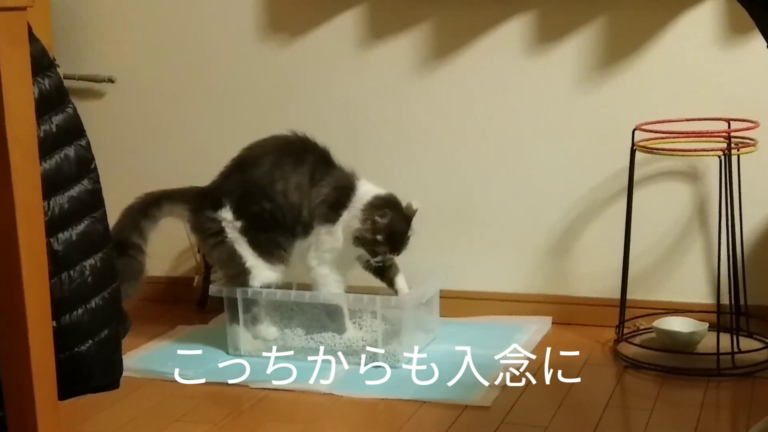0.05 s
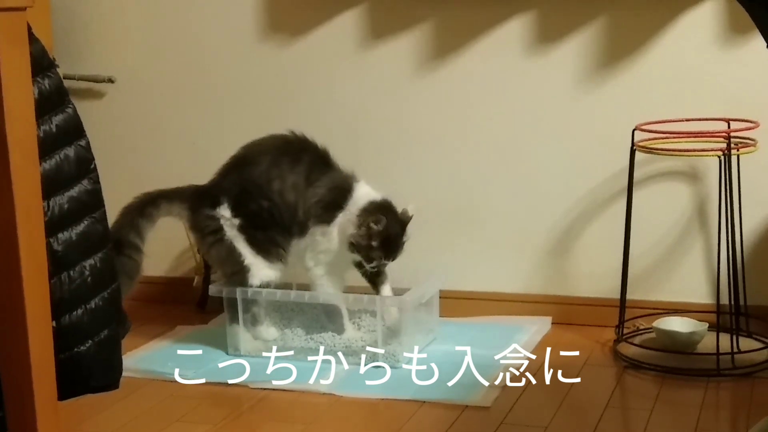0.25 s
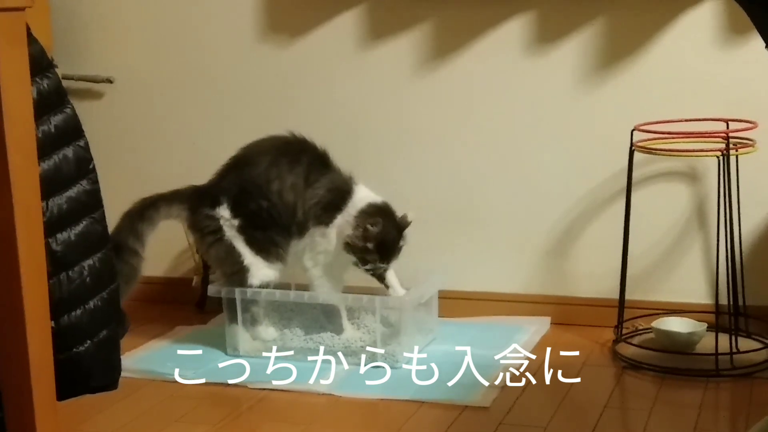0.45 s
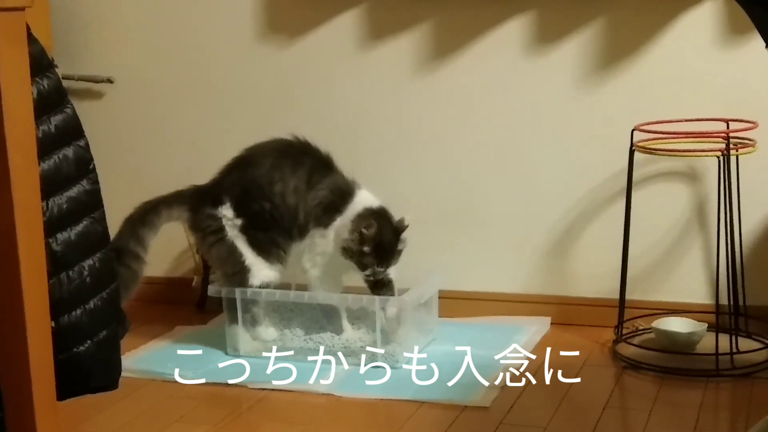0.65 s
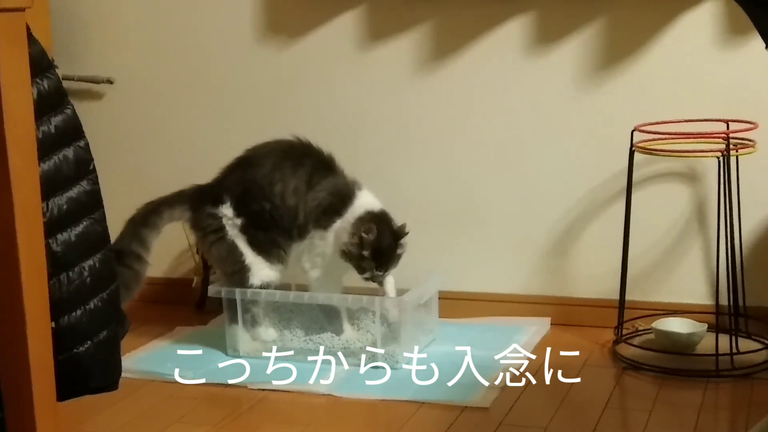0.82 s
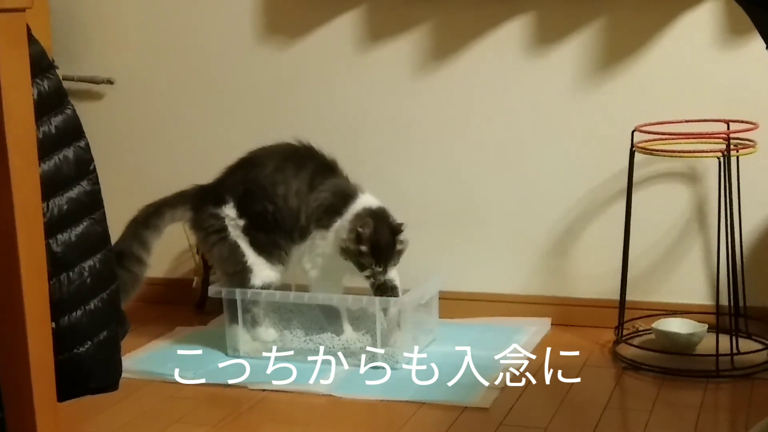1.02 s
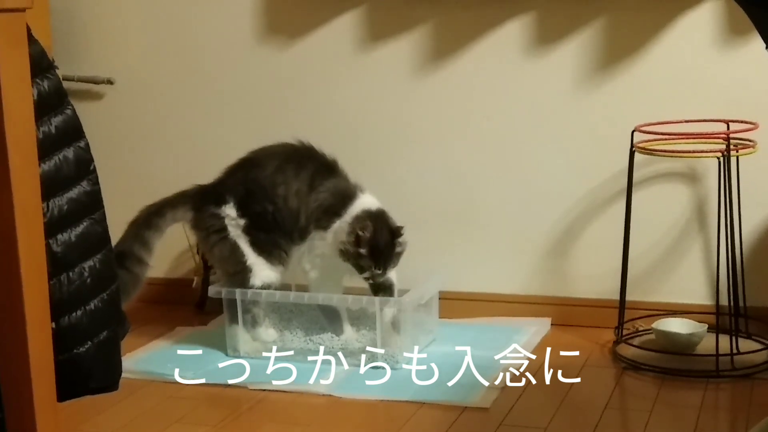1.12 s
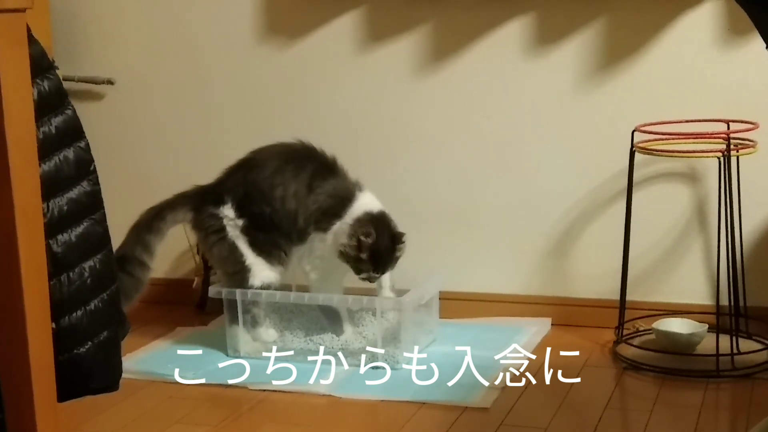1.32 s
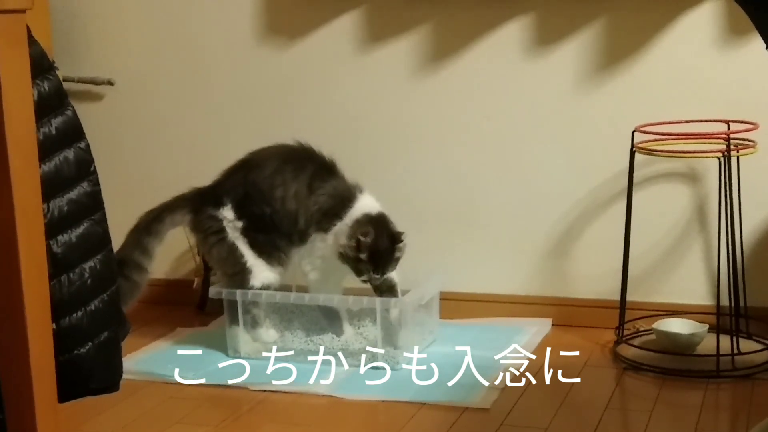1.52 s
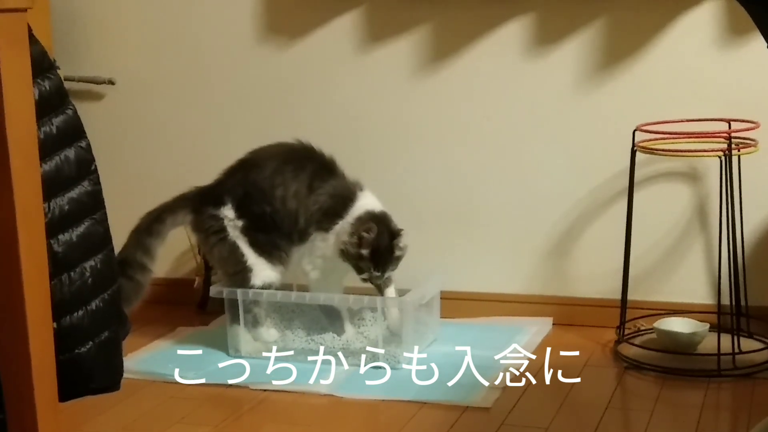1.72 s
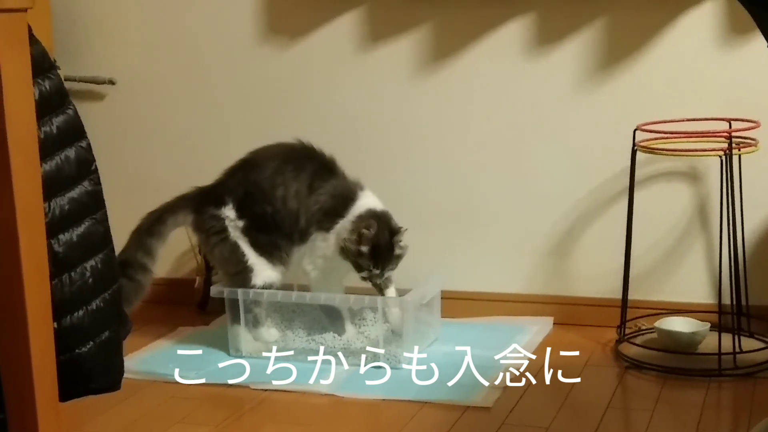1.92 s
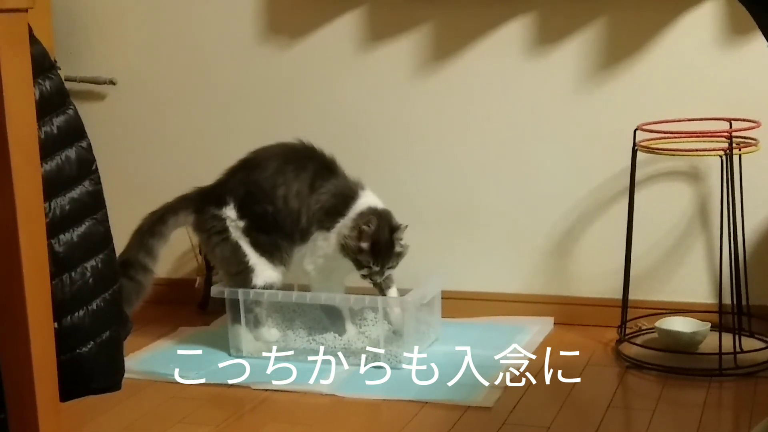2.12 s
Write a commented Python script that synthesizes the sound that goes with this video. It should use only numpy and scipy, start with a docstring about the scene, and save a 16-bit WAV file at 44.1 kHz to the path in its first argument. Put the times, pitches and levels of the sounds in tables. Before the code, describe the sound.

Cat paws wipe and scratch a plastic litter box in uneven strokes, with sharp claw clicks and sliding grains. Late on, the box knocks and creaks once, then the pawing resumes. The microphone is across a quiet room.

```python
"""A low hum and a faint hiss fill a small room. A cat starts to rub its soft pads along a plastic litter tub,
which rumbles under its weight. Then claws catch, scrape and snap free, shaking the wall, while litter
grains tick against the plastic and trickle back. At about 1.5 s a paw bumps the tub with a dull thump
and a few creaks, and some last strokes follow. Two microphone ports colour the treble differently."""
import sys
import numpy as np
from scipy import signal
from scipy.fft import rfft, irfft, next_fast_len
from scipy.io import wavfile
from scipy.ndimage import map_coordinates

SR = 44100
rng = np.random.default_rng(int(sys.argv[2]) if len(sys.argv) > 2 else 0)


def digitize_waveform(pressure):
    """Quantize a signal to 16-bit integers and store it at the path in sys.argv[1].

    Rows of a 2-D input are taken as channels; values are limited to [-1, 1].
    """
    field = np.atleast_2d(pressure).T
    bounded = np.clip(field, -1, 1)
    quanta = np.round(bounded * 32767).astype(np.int16)
    wavfile.write(sys.argv[1], SR, quanta)


N = 94815

# tone of a claw on plastic (frequency [Hz], level [dB])
CLAW_TONE = [(100, -22), (220, -10), (380, -3.5), (700, -4.5), (1300, -4), (2600, -2), (3800, -6),
             (6400, -11), (9300, -18.5), (15000, -39.5)]


def amp(db):
    """Turn decibels into a factor to multiply by."""
    return 10 ** (np.asarray(db) / 20)


def unit(x):
    """Scale x to an average (rms) size of 1."""
    return x / np.sqrt(np.mean(x ** 2) + 1e-20)


def with_peak(x, db):
    """Scale x to a peak level."""
    return amp(db) * x / np.abs(x).max()


def curve(points, hz):
    """Read between (frequency, value) points on a log frequency axis."""
    f, values = np.transpose(points)
    return np.interp(np.log(hz + 1), np.log(f + 1), values)


def filtered(x, response):
    """Filter x; response(f) gives the gain and phase at each frequency."""
    size = 2 * next_fast_len(N)
    return irfft(rfft(x, size) * response(np.fft.rfftfreq(size, 1 / SR)), size)[..., :N]


def filtered_from(x, response, start):
    """Filter only the half second of x that begins at start."""
    i, out = round(start * SR), np.zeros(N + SR)
    out[i:i + SR] = irfft(rfft(x[i:i + SR // 2], SR) * response(np.fft.rfftfreq(SR, 1 / SR)), SR)
    return out[:N]


def causal(gain):
    """A filter of this shape that rings only after a hit (minimum phase, unit energy)."""
    cepstrum = irfft(np.log(np.maximum(unit(gain), 1e-6)))
    half = len(cepstrum) // 2
    cepstrum[1:half] *= 2
    cepstrum[half + 1:] = 0
    return np.exp(rfft(cepstrum))


def since(start):
    """Seconds since a moment, zero before it."""
    return np.maximum(np.arange(N) / SR - start, 0)


def swell(start, rise, hold, fade):
    """Rise, hold, die away. A fade is always the time taken to drop by 60 dB."""
    return np.minimum(since(start) / max(rise, 1e-4), 1) * amp(-60 * since(start + rise + hold) / fade)


def burst(start, fade):
    """A very short crack of noise."""
    t = since(start)
    return (t > 0) * amp(-60 * t / fade) * rng.standard_normal(N)


def slips(per_s, size=N, spread_db=6.5, judder_db=0.24, judder_per_s=130):
    """A surface sticks and slips, giving tiny kicks of random timing and strength."""
    knots, scatter = rng.standard_normal((2, size))
    happens = rng.random(size) < per_s / SR
    sign = rng.choice([-1, 1], size)
    knots = knots[:int(size * judder_per_s / SR) + 4]
    judder = map_coordinates(knots, [np.arange(size) * judder_per_s / SR])
    return unit(happens * sign * amp(spread_db * np.tanh(scatter / 2) * 2 + judder_db * judder))


def diffuse(pair):
    """Two unrelated signals become left and right, most alike in the bass."""
    # how alike the sides are (frequency [Hz], likeness [-1 to 1])
    likeness = [(35, 0.095), (70, 0.76), (150, 0.88), (280, 0.64), (700, 0.35), (1400, -0.19),
                (4000, -0.25)]
    angle = lambda f: np.arccos(np.clip(curve(likeness, f), -1, 1)) / 2
    mid, side = filtered(pair, lambda f: np.array([np.cos(angle(f)), np.sin(angle(f))]))
    return np.array([mid + side, mid - side])


def room_tone(hiss_db=-75, hum_db=-80, hum_hz=70.1, hum_width_hz=9.1):
    """Faint hiss and the wavering hum of a household machine."""
    # tone of the hiss (frequency [Hz], level [dB])
    hiss_tone = [(25, -8), (70, -6.5), (110, -2), (200, 2), (400, -10), (1000, -18), (3000, -19.5),
                 (6000, -28.5), (8000, -15.5), (12500, -26), (15000, -49)]
    noise = lambda colour: unit(filtered(diffuse(rng.standard_normal((2, N))), colour))
    hiss = noise(lambda f: amp(curve(hiss_tone, f)))
    hum = noise(lambda f: 1 / (1 + (2 * (f - hum_hz) / hum_width_hz) ** 2))
    return amp(hiss_db) * hiss + amp(hum_db) * hum


def echoes(early_db=-4, early_fade=0.056, tail_db=-4, tail_rise=0.014):
    """Quick echoes from the tub, floor and wall, then the room's short tail."""
    # how long the room rings (frequency [Hz], fade [s])
    room_fades = [(80, 0.6), (300, 0.19), (1500, 0.25), (6000, 0.3), (12000, 0.4)]
    hz, t, noise = signal.stft(rng.standard_normal((2, SR // 3)), SR, nperseg=256)
    tail = signal.istft(noise * amp(-60 * t / curve(room_fades, hz)[:, None]), SR, nperseg=256)[1]
    t = np.arange(tail.shape[1]) / SR
    early = rng.standard_normal(tail.shape) * amp(-60 * t / early_fade)
    tail *= 1 - np.exp(-t / tail_rise)
    tail = amp(tail_db) * tail / np.linalg.norm(tail[0])
    return tail + amp(early_db) * early / np.linalg.norm(early[0])


def room(x, change_s=0.1):
    """The echo pattern keeps changing as the paw moves about."""
    hop, out = round(change_s * SR), np.zeros((2, N + SR))
    padded, blend = np.pad(x, (0, 2 * hop)), np.sqrt(np.hanning(2 * hop))
    for i in range(0, N, hop):
        part = signal.fftconvolve((padded[i:i + 2 * hop] * blend)[None], echoes(), axes=1)
        out[:, i:i + part.shape[1]] += part
    return diffuse(out[:, :N])


def rocking(boom_hz=113):
    """The tub rumbles faintly as the cat shifts its weight."""
    # weight shifts (start [s], rise [s], hold [s], fade [s], level [dB], extra boom [dB])
    shifts = [(0.154, 0.022, 0.26, 0.48, -73, -8), (0.401, 0.022, 0.086, .15, -71.5, -7),
              (0.66, 0.011, 0.033, 0.58, -62.5, 6), (1.064, 0.023, 0.083, 1, -72, -7),
              (1.358, 0.072, 0.052, .15, -62, -12), (1.486, 0.033, 0.029, 0.18, -54.5, 6),
              (1.724, 0.019, 0.041, 0.26, -60, -4.5), (1.891, 0.015, 0.13, 1, -74.5, -1)]
    # tone of the rumble (frequency [Hz], level [dB])
    rumble_tone = [(25, -37), (48, -11), (68, -1.5), (110, -21.5), (210, -8), (330, -11), (700, -28),
                   (3000, -89)]
    out = np.zeros(N)
    for start, rise, hold, fade, db, boom_db in shifts:
        colour = lambda f: causal(amp(curve(rumble_tone, f) + boom_db / (1 + (f / boom_hz) ** 4)))
        force = amp(db) * swell(start, rise, hold, fade) * rng.standard_normal(N)
        out += filtered_from(force, colour, start)
    return out


def litter(grains_per_s=1500):
    """Loose grains slide back in a fine hiss."""
    # little slides (start [s], rise [s], hold [s], fade [s], level [dB])
    slides = [(0.427, 0.027, .03, 0.13, -70.5), (0.935, 0.011, 0.012, 0.86, -62),
              (1.107, 0.014, 0.017, 0.18, -58.5), (1.346, .01, 0.15, 0.27, -61.5),
              (1.698, 0.01, 0.021, 0.18, -51.5), (1.835, 0.0094, 0.15, 0.099, -70)]
    # tone of sliding grains (frequency [Hz], level [dB])
    grain_tone = [(800, 6), (2500, 5.5), (5500, 1), (7000, 11.5), (10000, 3.5), (15000, -8)]
    flow = sum(amp(db) * swell(*timing) for *timing, db in slides)
    return filtered(flow * slips(grains_per_s), lambda f: causal(amp(curve(grain_tone, f))))


def clicks(rows, fade, sharpness):
    """Tiny cracks, each ringing broadly around one pitch."""
    out = np.zeros(N)
    for start, db, hz in rows:
        ring = lambda f: (1j * f / (hz * hz - f * f + 1j * f * hz / sharpness)) ** 2
        out += with_peak(filtered_from(burst(start, fade), ring, start), db)
    return out


def grain_ticks():
    """Single grains hit the plastic with a high tick."""
    # grain hits (time [s], level [dB], pitch [Hz])
    hits = [(0.151, -62, 11500), (0.467, -51, 10100), (0.823, -52, 6100), (0.969, -53.5, 6300),
            (1.429, -38, 9240), (1.435, -41.5, 6080), (1.481, -44, 9700), (1.722, -41, 8850),
            (1.729, -39.5, 9450), (1.859, -50, 5560), (1.867, -53, 5860)]
    return clicks(hits, fade=0.017, sharpness=4.8)


def creaks():
    """The tub flexes and clicks as it is bumped."""
    # flexes of the plastic (time [s], level [dB], pitch [Hz])
    flexes = [(1.483, -36.5, 1650), (1.505, -41, 1670), (1.5225, -32, 2130), (1.5345, -33, 2310)]
    return clicks(flexes, fade=0.016, sharpness=2.1)


def thump(rise=0.0011, low_cut_hz=101):
    """Bumped by a paw, the loaded tub bottom knocks on the floor and rebounds."""
    # knocks on the floor (time [s], level [dB])
    knocks = [(1.4778, -33.5), (1.491, -30.5), (1.51, -50.5), (1.534, -47), (1.551, -46)]
    # notes of the tub bottom (pitch [Hz], level [dB], fade [s])
    notes = [(72, -24, 0.57), (136.6, -9, 0.14), (193.8, 1.5, 0.31), (234.2, 2, 0.079), (274, -7, 0.092),
             (335, -28, 0.026), (436.5, -12, 0.135)]
    low_cut = signal.butter(2, low_cut_hz, "high", fs=SR, output="sos")
    out = np.zeros(N)
    for start, knock_db in knocks:
        t = since(start)
        ring = sum(amp(db - 60 * t / fade) * np.sin(2 * np.pi * hz * t) for hz, db, fade in notes)
        ring *= 1 - np.exp(-t / rise)
        out += with_peak(signal.sosfilt(low_cut, ring), knock_db)
    return out


def wall(tone, body_db, treble_db, low_cut_hz, body_hz=694, treble_hz=3590):
    """The tub wall as a filter; the spot that is touched sets its body, treble and low cut."""
    # where the wall rings (pitch [Hz], width [Hz], level against a plain scrape [dB])
    rings = [(316, 59, 3.5), (437, 18, -1), (636, 52, -1), (768, 36, 3.5), (917, 67, 3), (1088, 180, 2.5),
             (1167, 35, -17), (1518, 76, 0.5), (1740, 160, 1.5), (2330, 185, 2)]

    def response(f):
        ringing = sum(amp(db) ** 2 / (1 + (2 * (f - hz) / width) ** 2) for hz, width, db in rings)
        body = body_db / (1 + (f / body_hz) ** 4)
        treble = treble_db * (1 - 1 / (1 + (f / treble_hz) ** 6))
        low_cut = 1 / np.sqrt(1 + (low_cut_hz / (f + 1)) ** 8)
        return causal(amp(curve(tone, f) + body + treble) * low_cut * np.sqrt(1 + ringing))
    return response


def strokes(rows, tone, slips_per_s):
    """Each stroke is a run of slips that shakes the tub wall with a set energy."""
    out = np.zeros(N)
    for start, rise, hold, fade, db, *spot in rows:
        force = amp(db) * swell(start, rise, hold, fade)
        kicks = np.resize(slips(slips_per_s, size=SR // 2), N)
        shaking = filtered_from(force * kicks, wall(tone, *spot), start)
        out += unit(shaking) * np.sqrt(np.mean(force ** 2))
    return out


def pad_taps(rise=0.0038, fade=0.17):
    """A pad lands on the wall, which gives a short hollow note."""
    # soft landings (time [s], level [dB], pitch [Hz])
    landings = [(.229, -46, 616), (.645, -45, 442), (1.064, -47.5, 1106), (1.366, -50, 396)]
    note = lambda start, hz: swell(start, rise, 0, fade) * np.sin(2 * np.pi * hz * since(start))
    return sum(amp(db) * note(start, hz) for start, db, hz in landings)


def pad_rubs():
    """Soft pads stick and slip along the tub wall."""
    # rubs (start [s], rise [s], hold [s], fade [s], level [dB], body [dB], treble [dB], low cut [Hz])
    rubs = [(.125, .010, 0.042, 0.13, -73.5, -24, 4, 1100), (.177, 0.013, 0.062, 0.15, -57.5, 5, 3, 404),
            (.208, 0.011, 0.03, 0.19, -49, 12, 6, 420), (.250, 0.0028, 0.1, 0.091, -51, 13, 10, 377),
            (.395, 0.05, 0.016, 0.055, -49.5, -3.5, 6, 290), (.607, 0.006, 0.021, 0.078, -62.5, 6, 4, 350),
            (.630, 0.012, 0.064, 0.15, -48, 5.5, 0.5, 362), (.705, 0.0077, 0.047, 0.33, -47, 4.5, 5, 440),
            (.790, 0.0082, 0.09, 0.2, -53.5, -12, 11, 480),
            (.930, 0.034, 0.019, 0.042, -54.5, -9, 13.5, 408),
            (1.058, 0.0077, 0.075, 0.33, -54.5, 5.5, 3.5, 720),
            (1.090, 0.018, 0.022, 0.36, -43.5, 2.5, 7, 560), (1.170, 0.024, 0.045, 0.48, -50, 4, 8, 575),
            (1.570, 0.0075, 0.11, .16, -56, -3, 3.5, 507),
            (1.772, 0.013, 0.013, 0.11, -45.5, -17, 2.5, 228),
            (1.840, 0.0074, 0.035, 0.47, -61.5, -6, 18.5, 250)]
    # tone of a pad on plastic (frequency [Hz], level [dB])
    pad_tone = [(100, -43), (250, -17), (420, -5), (650, -3.5), (1200, -2), (2400, -1), (3500, -10.5),
                (6400, -22.5), (9300, -31.5), (15000, -44.5)]
    return strokes(rubs, pad_tone, slips_per_s=3000)


def claw_scrapes():
    """Claws catch and drag on the plastic in short strokes."""
    # drags (start [s], rise [s], hold [s], fade [s], level [dB], body [dB], treble [dB], low cut [Hz])
    drags = [(.320, 0.0013, 0.0073, .06, -43, -6, -9.5, 500),
             (.330, 0.0048, 0.012, 0.23, -38.5, -1.5, -7.5, 300),
             (.358, 0.0055, 0.0084, 0.074, -47, 6, 6.5, 261),
             (.848, 0.0014, 0.0056, 0.13, -36.5, -5.5, -3, 307),
             (.878, 0.0098, 0.007, 0.23, -46, -12, -7, 274), (1.280, 0.0013, 0.0035, 0.15, -40, -2, 5, 563),
             (1.3635, .002, 0.0082, 0.058, -38.5, 2, -4.5, 337),
             (1.388, 0.0022, 0.0098, .10, -40.5, 2.5, -3.5, 340),
             (1.422, 0.0059, 0.011, 0.4, -49, -7, -4, 450), (1.522, .002, 0.0067, 0.42, -50.5, 13, 6, 505),
             (1.702, 0.0026, 0.02, 0.23, -48, 4.5, -2.5, 584),
             (1.716, 0.0035, 0.0054, .20, -42, -20, -3.5, 487)]
    return strokes(drags, CLAW_TONE, slips_per_s=2600)


def claw_snaps(fade=0.0061):
    """A claw lets go and the wall snaps back."""
    # claws letting go (time [s], level [dB], treble [dB])
    releases = [(.3205, -33, -9), (.3235, -32, -9), (.417, -40, -4), (.450, -39, -5), (.6455, -36, -8),
                (.658, -39, -8), (.8485, -31, -5), (.855, -32, 3), (1.2748, -24, -4), (1.2815, -26, 4),
                (1.2848, -25, 7), (1.3645, -32, -7), (1.7035, -39, 2)]
    out = np.zeros(N)
    for start, db, treble_db in releases:
        spot = wall(CLAW_TONE, 0, treble_db, low_cut_hz=594)
        out += with_peak(filtered_from(burst(start, fade), spot, start), db)
    return out


def scene():
    """All of the cat's work in the tub, heard from across the room."""
    pawing = pad_rubs() + claw_scrapes() + claw_snaps() + pad_taps() + litter() + creaks()
    ticks = grain_ticks()
    low = thump() + rocking()
    direct = amp(-5) * pawing + ticks + low
    echo = room(pawing + amp(-6.5) * ticks + amp(-8.5) * low)
    return direct + echo + room_tone()


def record(dry, left_lag_s=0.00003, roll_off_hz=14700, top_hz=15500):
    """Each microphone port (its opening) colours the sound; the highest treble is cut off."""
    # tone of the left port (frequency [Hz], level [dB])
    left_tone = [(60, 2), (230, 3.5), (600, 2.5), (3200, 2), (4200, 3), (5500, 7.5), (6700, 9),
                 (7300, -3.5), (8000, -17.5), (9500, -5.5), (13000, -5)]
    # tone of the right port (frequency [Hz], level [dB])
    right_tone = [(60, 5), (230, 0.5), (600, 3), (3200, 2), (4200, -1.5), (5500, -2.5), (6700, -9),
                  (8000, -11), (9400, -1), (11000, -3.5), (13000, -3.5)]

    def ports(f):
        left = amp(curve(left_tone, f)) * np.exp(-2j * np.pi * f * left_lag_s)
        right = amp(curve(right_tone, f))
        roll_off = 1 / np.sqrt(1 + (f / roll_off_hz) ** 20)
        return np.array([left, right]) * roll_off * (f < top_hz)
    return filtered(dry, ports)


dry = scene()
out = record(dry)
digitize_waveform(out)
```